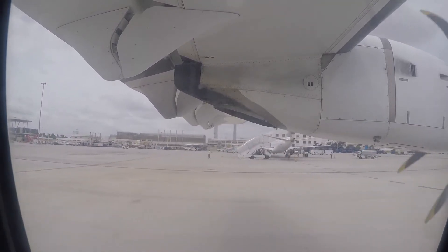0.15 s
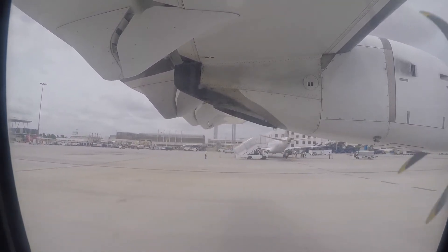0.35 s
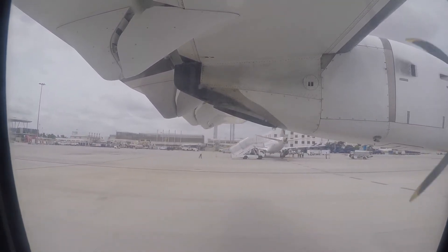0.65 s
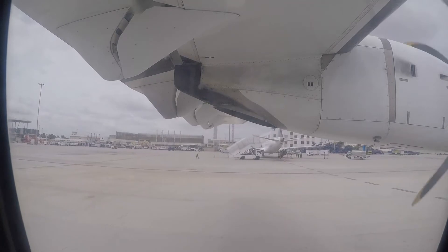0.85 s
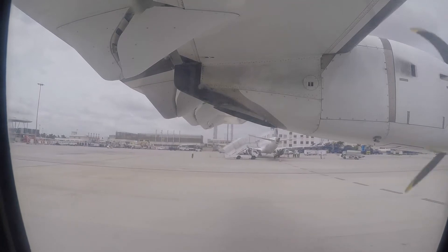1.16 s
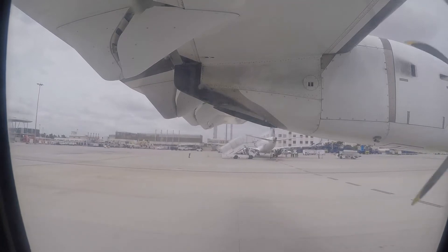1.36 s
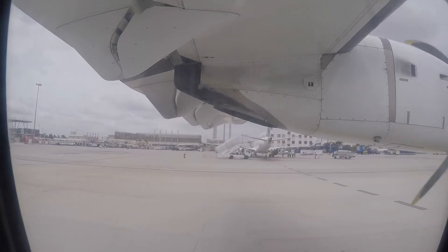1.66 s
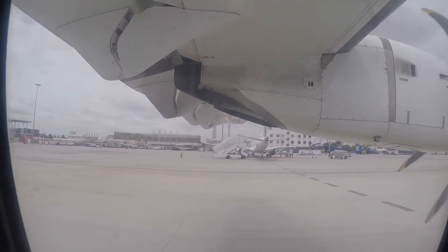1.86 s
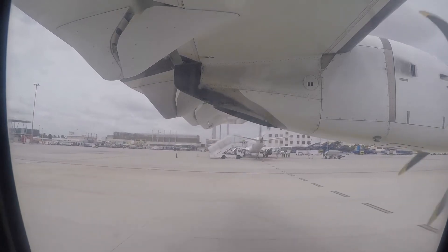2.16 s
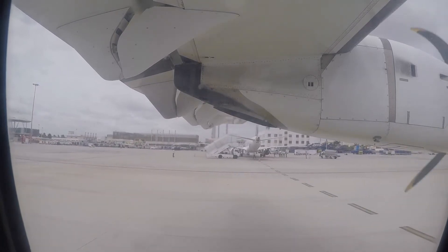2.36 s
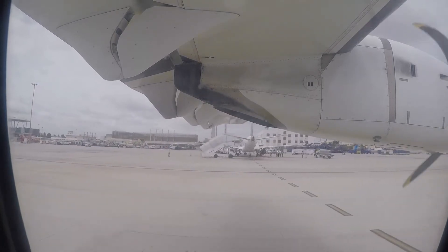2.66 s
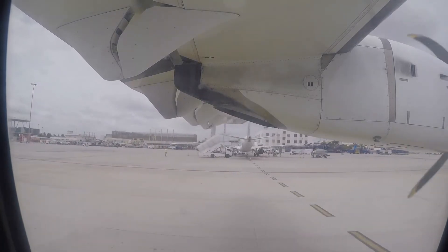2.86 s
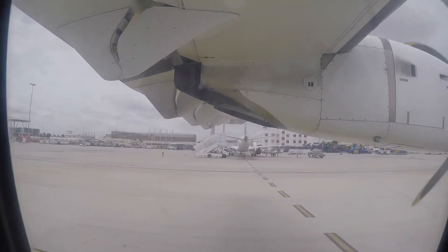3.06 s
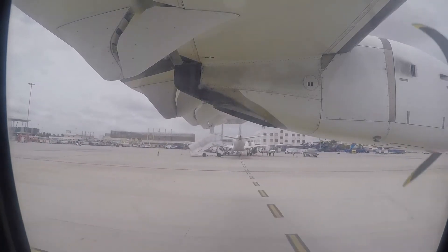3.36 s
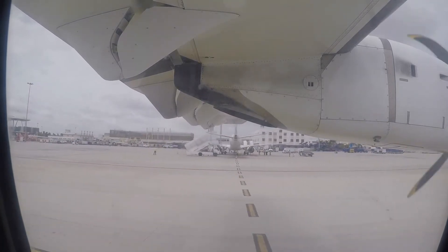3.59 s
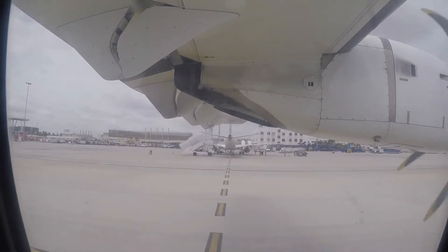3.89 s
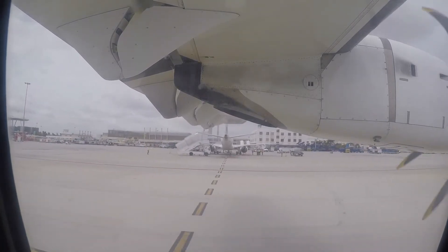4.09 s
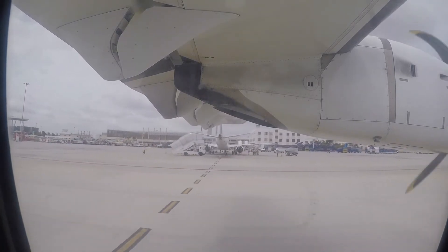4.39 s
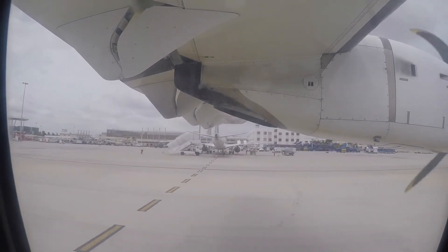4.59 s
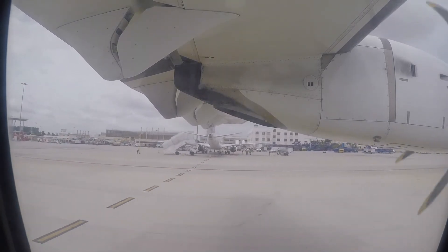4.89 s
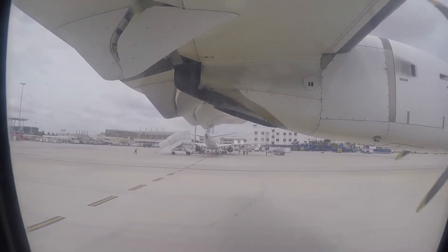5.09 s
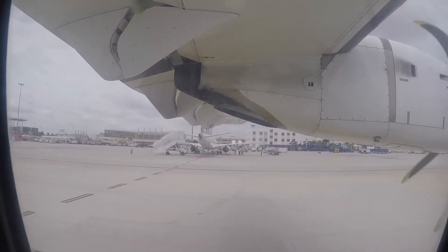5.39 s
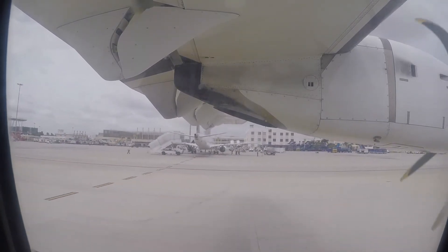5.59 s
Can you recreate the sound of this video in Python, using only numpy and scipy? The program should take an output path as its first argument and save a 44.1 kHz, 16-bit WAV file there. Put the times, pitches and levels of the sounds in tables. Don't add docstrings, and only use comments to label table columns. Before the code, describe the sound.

Heavy low propeller drone throbs through an aircraft hull while it rolls over an apron, hydraulic whine sagging and rising beneath the muffled roar.

```python
import sys
import numpy as np
from scipy import signal
from scipy.fft import rfft, irfft
from scipy.io import wavfile
from scipy.ndimage import uniform_filter1d

SR = 44100
rng = np.random.default_rng(int(sys.argv[2]) if len(sys.argv) > 2 else 0)


def transcribe(u):
    v = np.clip(np.atleast_2d(u).T, -1, 1)
    q = np.round(v * 32767).astype(np.int16)
    wavfile.write(sys.argv[1], SR, q)


def amplitude_ratio(level_db):
    exponent = np.asarray(level_db, float) / 20
    return 10 ** exponent


N = 253134
TIME = np.arange(N) / SR
PUMP_LAG_S = 0.105

# start_s, blade_pass_hz, loading_db
PROPELLER = [(0, 83.55, -1.5), (.45, 83.6, -1), (.9, 83.62, -4.5), (1.3, 83.85, -10), (2, 84.05, -12.5),
             (3.1, 84, -17), (4, 83.9, -14), (5.74, 84.1, -20)]
# start_s, level_db
ENGINE_ROAR = [(0, -45.5), (1.1, -46), (1.4, -45.5), (1.9, -46.5), (2.4, -45.5), (2.9, -43.5), (3.4, -46.5),
               (4.4, -46), (4.85, -48), (5.2, -47), (5.74, -46.5)]


def hull_boom():
    # start_s, pitch_hz, level_db
    boom_course = [
        (0, 127.5, -22),
        (1.25, 125, -17),
        (1.6, 126.8, -22.5),
        (2.2, 126.5, -28),
        (3, 126.4, -17.5),
        (4.2, 129.9, -31.5),
        (4.9, 129.2, -25.5),
        (5.74, 130.5, -30.5),
    ]
    # middle_s, width_s, level_db
    shaft_swells = [(0.08, 0.14, -14), (0.3, 0.041, -18), (0.59, 0.23, -12.5), (0.99, 0.14, -14),
                    (1.44, 0.31, -13.0), (1.84, 0.086, -16.5), (2.14, 0.13, -11), (2.39, 0.063, -11.5),
                    (2.56, 0.11, -11.5), (2.81, 0.21, -14), (3.01, 0.07, -13.5), (3.25, 0.11, -18),
                    (3.45, 0.075, -18), (3.83, 0.36, -15.5), (4.29, 0.12, -14.5), (4.53, 0.07, -17.5),
                    (4.71, 0.095, -18.5), (5.13, 0.13, -19), (5.39, 0.14, -19.5), (5.72, 0.03, -23.5)]
    pitch_hz, rest_db = curves(boom_course)
    pitch_hz = uniform_filter1d(pitch_hz, size=9000)
    driven = swells(shaft_swells, rest_db) * amplitude_ratio(-0.67) * tone(pitch_hz, 0.49, 0.33)
    skirt = amplitude_ratio(-28) * ringing(pitch_hz=curves(boom_course)[0], width_hz=20, steady=0.1)
    return driven + skirt


def wheel_thuds():
    # start_s, level_db
    roughness = [
        (0, -21),
        (1.9, -28),
        (2.3, -34.5),
        (2.9, -25),
        (3.3, -21.5),
        (5.74, -19),
    ]
    # middle_s, width_s, level_db
    low_joints = [
        (0.19, 0.07, -23),
        (0.38, 0.16, -19),
        (3.16, 0.19, -15),
        (3.57, 0.12, -17.5),
        (3.88, 0.14, -20.5),
        (4.39, 0.07, -21.0),
        (4.54, 0.14, -21.5),
        (4.73, 0.08, -24),
    ]
    # middle_s, width_s, level_db
    high_joints = [(1.19, 0.22, -22), (1.78, 0.11, -16), (3.06, 0.082, -21.5), (3.63, 0.1, -15.5),
                   (3.93, 0.07, -23), (4.13, 0.06, -17), (4.26, 0.049, -15), (4.49, 0.07, -18.5),
                   (4.68, 0.075, -13), (5.04, 0.05, -15.5), (5.34, 0.31, -14.5), (5.7, 0.079, -20)]
    # pitch_hz, width_hz
    hull_modes = [(40, 12), (56.5, 6.8)]
    ground_db = curves(roughness)[0]
    out = np.zeros(N)
    for joints, offset_db, (mode_hz, width_hz) in zip((low_joints, high_joints), (-4.1, -1.5), hull_modes):
        out += swells(joints, ground_db + offset_db) * ringing(mode_hz, width_hz, steady=0.72)
    return out


def panel_hum():
    # middle_s, width_s, level_db, pitch_hz
    hum_surges = [(0, .06, -22.5, 416.1), (.09, 0.064, -26, 419), (.28, 0.16, -24, 417.6),
                  (.54, 0.077, -26, 417.3), (.68, 0.091, -27.5, 415), (.82, 0.055, -30, 417),
                  (1.1, 0.064, -30.5, 424.4), (2.18, 0.088, -29, 427.4), (2.8, 0.091, -34, 431),
                  (2.95, 0.082, -29, 421.5), (3.78, .2, -34.5, 429.5), (4.4, .2, -33, 433.5),
                  (5.55, 0.07, -32, 426), (5.68, 0.064, -29, 424)]
    pitch_hz = curves([(row[0], row[3]) for row in hum_surges])[0]
    load_db = curves(PROPELLER)[1]
    level = swells(hum_surges, -36.5 + 0.21 * load_db)
    return level * tone(uniform_filter1d(pitch_hz, size=6000), 0.51, 0.69)


def propeller():
    # multiple, level_db
    blade_orders = [(3, -37.5), (4, -32), (6, -42), (7, -47), (8, -53.5), (9, -55), (10, -54.5)]
    pass_hz, load_db = curves(PROPELLER)
    return sum(amplitude_ratio(db + load_db) * tone(k * pass_hz, 4.0, 0.96) for k, db in blade_orders)


def gear_mesh():
    # start_s, level_db
    mesh_level = [
        (0, -59),
        (1, -60),
        (1.25, -61),
        (1.8, -57.5),
        (2.5, -60.5),
        (3.05, -63),
        (3.3, -72),
        (4.2, -71),
        (4.6, -64),
        (5.74, -70.5),
    ]
    pass_hz = curves(PROPELLER)[0]
    return amplitude_ratio(curves(mesh_level)[0]) * tone(20 * pass_hz, 1.6, 0.34)


def pump_rates():
    # start_s, piston_rate_hz
    pump_course = [(0, 1032.4), (.35, 1031.4), (.7, 1030.8), (.95, 1024.9), (1.3, 1014.4), (1.5, 1011.1),
                   (1.7, 1009.3), (1.9, 1009.4), (2.1, 1010.5), (2.5, 1015.5), (2.8, 1019.6), (3.05, 1024),
                   (3.5, 1029.8), (3.9, 1033), (4.3, 1033.8), (5.74, 1035.2)]
    rate_hz = uniform_filter1d(curves(pump_course)[0], size=8000)
    slope_hz_per_s = uniform_filter1d(np.gradient(rate_hz) * SR, size=8000)
    return rate_hz, PUMP_LAG_S / 2 * slope_hz_per_s


def drawing(release_s):
    opening = np.clip((TIME - 1.0) / 0.07, 0, 1)
    return opening * np.exp(-np.maximum(TIME - 3.02, 0) / release_s)


def hydraulic_pipe():
    # middle_s, width_s, level_db
    pipe_surges = [
        (0.17, 0.13, -57),
        (0.66, 0.59, -55),
        (1.35, 0.14, -43),
        (1.71, 0.26, -45.5),
        (2.33, 0.34, -45.5),
        (2.9, 0.21, -46.5),
        (3.49, 0.33, -53),
        (4.63, 0.14, -52.5),
        (5.06, 0.19, -54),
    ]
    rate_hz, lead_hz = pump_rates()
    idle_db, draw_db = -59, -52.5
    level = swells(pipe_surges, idle_db + (draw_db - idle_db) * drawing(0.3))
    valve_shut = 1 - 0.8 * bell(middle_s=1.11, width_s=0.18)
    return level * valve_shut * tone(rate_hz - lead_hz, 0.6, 0.15)


def pump_pistons():
    # multiple, idle_db, drawing_db, release_s, trailing_pump_share
    piston_orders = [(2, -70, -65, .15, .5), (3, -57.5, -53.5, .07, .5), (4, -69, -62.5, .35, .9)]
    rate_hz, lead_hz = pump_rates()
    apart_turns = 0.567 + PUMP_LAG_S * (rate_hz - rate_hz.min())
    growth_db = 0.9 * np.clip(TIME - 1.0, 0, 2.02)
    mount_db = 3 * np.exp(-((rate_hz - 1018.5) / 5) ** 2)
    out = np.zeros(N)
    for k, idle_db, draw_db, release_s, second in piston_orders:
        draw = drawing(release_s)
        pair = 1 + second * np.exp(2j * np.pi * k * apart_turns)
        level_db = idle_db + draw * (draw_db + growth_db + mount_db - idle_db)
        heard_hz = k * (rate_hz + lead_hz * (1 - second ** 2) / (1 + second ** 2))
        out += amplitude_ratio(level_db) * abs(pair) * tone(heard_hz, 1.1 * (1.2 - draw), 0.25)
    return out


def turbines():
    # pitch_hz, level_db
    gear_whines = [(2874, -50), (3066, -60.5), (3833, -70), (4797, -74), (7764, -88)]
    roar_db = curves(ENGINE_ROAR)[0]
    whines = sum(amplitude_ratio(db) * tone(hz, 0.55, 0.1) for hz, db in gear_whines)
    return amplitude_ratio(0.82 * (roar_db - roar_db.mean())) * whines


def roar():
    # pitch_hz, density_db
    body_spectrum = [(11, -35), (18, -8.5), (43, -1.5), (75, -4), (100, 0), (126, -2), (148, -5),
                     (178, -12), (256, -14.5), (302, -12.5), (436, -18), (531, -27.5), (753, -34.5),
                     (950, -46.5)]
    # pitch_hz, density_db
    air_spectrum = [(500, -36), (850, -6.5), (1020, -3), (1110, -7), (1650, -8), (1950, -10), (2700, -5),
                    (2940, -5), (3520, -16), (3980, -12.5), (4880, -12), (5850, -22.5), (8700, -29.5),
                    (13900, -32.5), (15200, -41)]
    # pitch_hz, width_hz, level_db
    wall_panels = [(303.1, 42, -37.5), (435.6, 30, -39), (4090, 100, -64), (4900, 210, -64.5),
                   (6700, 1300, -66), (13780, 120, -89), (14480, 250, -82), (14900, 200, -82.5)]
    air_db, load_db = curves(ENGINE_ROAR)[0], curves(PROPELLER)[1]
    body_db = -25.5 + 0.54 * (air_db - air_db.mean()) + 0.06 * (load_db - load_db.mean())
    out = amplitude_ratio(body_db - 2.5) * wash(body_spectrum, (180, 800), patchy_db=0.0, swell_db=-0.53)
    out += amplitude_ratio(air_db - 1.21) * wash(air_spectrum, (1100, 2800), patchy_db=0.75, swell_db=0.3)
    for hz, width_hz, db in wall_panels:
        drive_db = body_db if hz < 1000 else air_db
        out += amplitude_ratio(db + drive_db - drive_db.mean()) * ringing(hz, width_hz, steady=0.038)
    return out


def trim_creak():
    # start_s, peak_db, pitch_hz
    creaks = [
        (4.634, -50, 9655),
    ]
    out, t = np.zeros(N), np.arange(300) / SR
    for start_s, db, hz in creaks:
        at = round(start_s * SR)
        out[at:at + len(t)] += amplitude_ratio(db - 60 * t / 0.012) * np.sin(2 * np.pi * hz * t)
    return out


def evened(x):
    return x / np.sqrt(np.mean(x ** 2) + 1e-20)


def curves(rows):
    s, *columns = np.transpose(rows)
    return [np.interp(TIME, s, c) for c in columns]


def bell(middle_s, width_s):
    return np.exp(-2 * ((TIME - middle_s) / width_s) ** 2)


def swells(rows, rest_db):
    bells = sum((amplitude_ratio(row[2]) * bell(*row[:2])) ** 2 for row in rows)
    return np.sqrt(amplitude_ratio(rest_db) ** 2 + bells)


def wander(rate_hz):
    z = rfft(rng.standard_normal(N))
    lowpass = np.exp(-(np.fft.rfftfreq(N, 1 / SR) / rate_hz) ** 2)
    return evened(irfft(z * lowpass, N))


def tone(pitch_hz, waver_db, drift):
    turns = np.cumsum(pitch_hz * np.ones(N)) / SR + rng.random()
    phase = 2 * np.pi * turns + drift * wander(6)
    return np.sqrt(2) * np.sin(phase) * amplitude_ratio(waver_db * wander(2.3))


def ringing(pitch_hz, width_hz, steady):
    r = np.exp(-np.pi * width_hz / SR)
    z = rng.standard_normal(N + SR) + 1j * rng.standard_normal(N + SR)
    z = signal.lfilter([1], np.poly([r, r]), z)[SR:]
    size = abs(z) + 0.25 * np.mean(abs(z))
    z = z / size ** np.clip(steady, 0, 1)
    carrier = np.exp(2j * np.pi * np.cumsum(pitch_hz * np.ones(N)) / SR)
    return evened((z * carrier).real)


def wash(spectrum, band_hz, patchy_db, swell_db):
    frames, hz = N // 512 + 6, np.fft.rfftfreq(2048, 1 / SR)
    a, b, patches = rng.standard_normal((frames, 1025, 3)).T
    patches = uniform_filter1d(patches, size=14, axis=0)
    patches = evened(uniform_filter1d(patches, size=8, axis=1))
    f, db = np.transpose(spectrum)
    gain = amplitude_ratio(np.interp(np.log(hz + 1), np.log(f + 1), db, left=-90, right=-90))
    in_band = (hz > band_hz[0]) & (hz < band_hz[1])
    share = np.sum(gain[in_band] ** 2) / np.sum(gain ** 2)
    z = (a + 1j * b) * gain[:, None] * amplitude_ratio(patchy_db * patches)
    x = signal.istft(z, nperseg=2048, noverlap=1536)[1][:N]
    return evened(x) / np.sqrt(share) * amplitude_ratio(swell_db * wander(7))


def scene():
    hull = hull_boom() + wheel_thuds() + panel_hum()
    machinery = propeller() + gear_mesh() + hydraulic_pipe() + pump_pistons() + turbines()
    return (hull + machinery + roar() + trim_creak())[None]


def thinned(x):
    hz, t, z = signal.stft(x, SR, nperseg=1024, noverlap=768)
    scraps = uniform_filter1d(rng.standard_normal(z.shape[1:]), size=7, axis=0)
    scraps = evened(uniform_filter1d(scraps, size=9, axis=1))
    edge = np.interp(hz, [12000, 13000, 14300, 15300], [-3, -1.3, -0.8, 0.1])
    shut = np.clip((edge[:, None] - scraps) * 4, 0, 1)
    return signal.istft(z * amplitude_ratio(-30 * shut), SR, nperseg=1024, noverlap=768)[1][:, :N]


def top_cut(x):
    return signal.sosfilt(signal.butter(12, 15300, fs=SR, output="sos"), x)


def record(dry):
    limited = 1.368 * np.tanh(dry / 1.261)
    fade = np.clip(np.minimum(N / SR - TIME, 2 * TIME + 0.002) / 0.005, 0, 1)
    return top_cut(thinned(limited) * fade)


dry = scene()
out = record(dry)
transcribe(out)
```